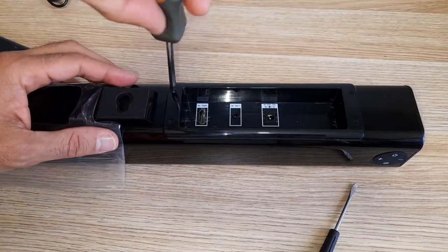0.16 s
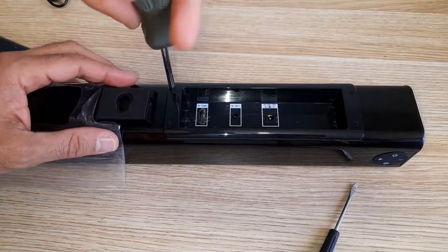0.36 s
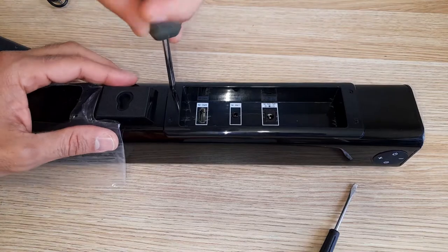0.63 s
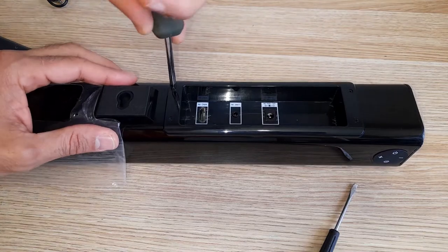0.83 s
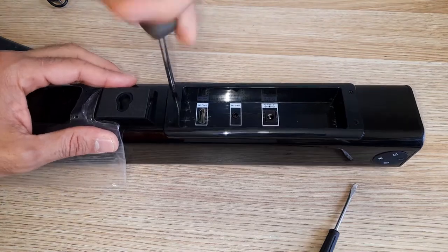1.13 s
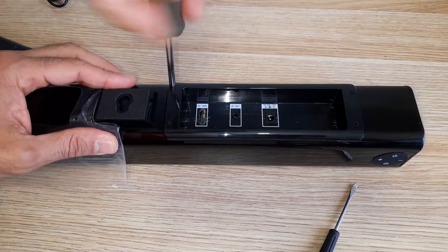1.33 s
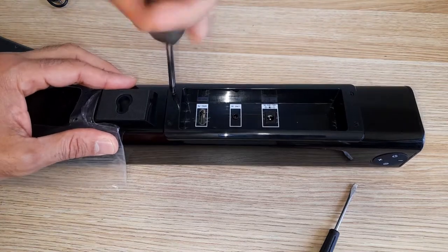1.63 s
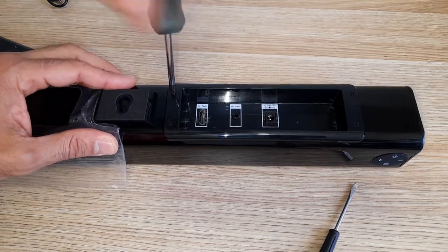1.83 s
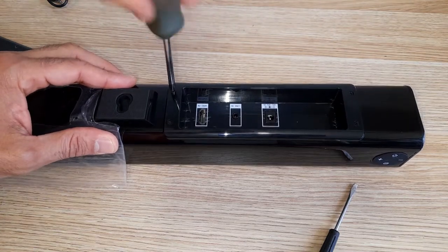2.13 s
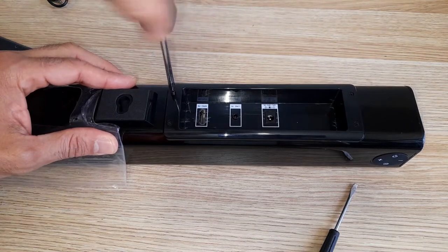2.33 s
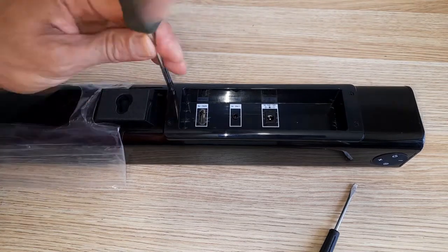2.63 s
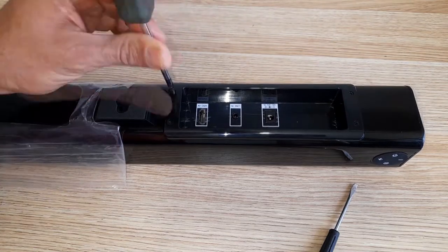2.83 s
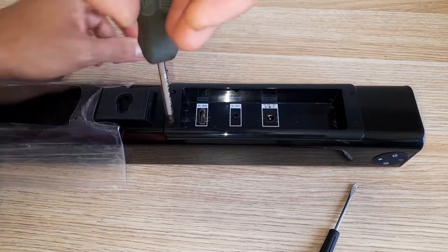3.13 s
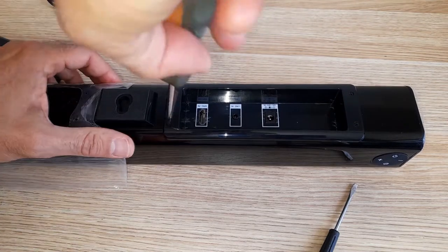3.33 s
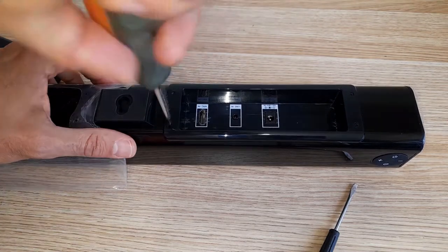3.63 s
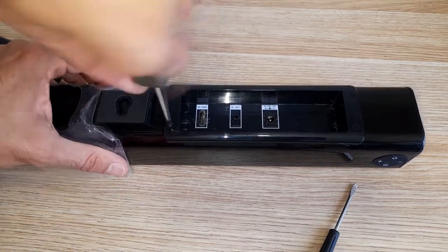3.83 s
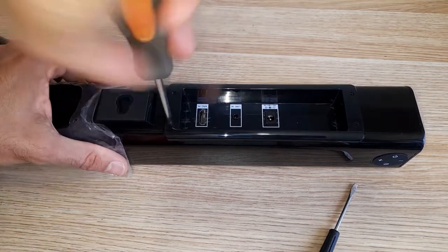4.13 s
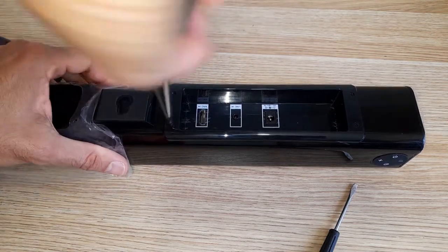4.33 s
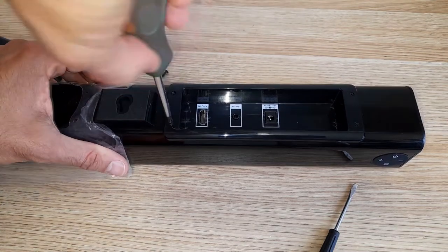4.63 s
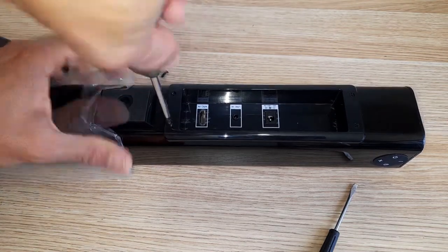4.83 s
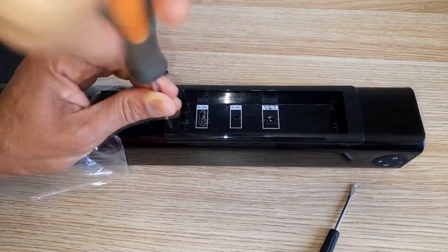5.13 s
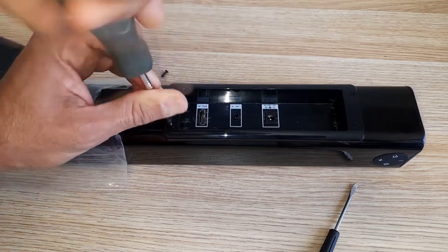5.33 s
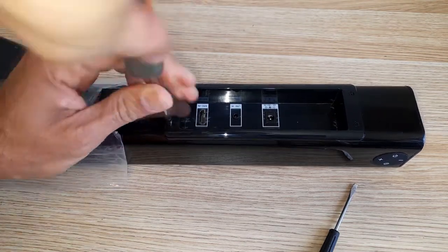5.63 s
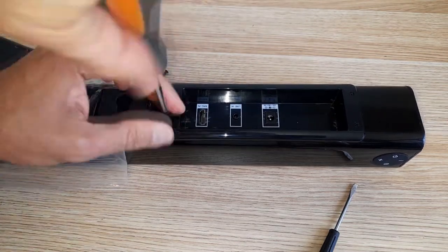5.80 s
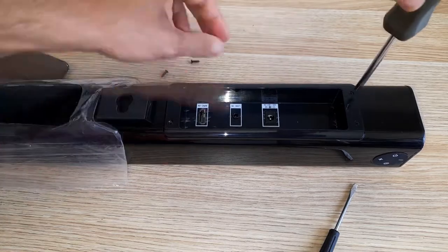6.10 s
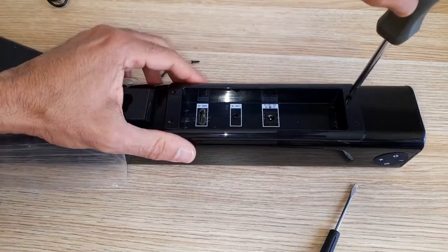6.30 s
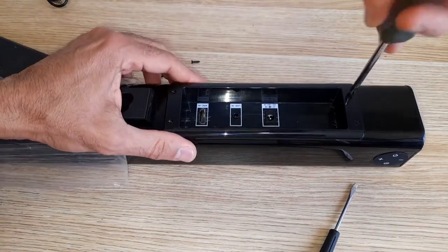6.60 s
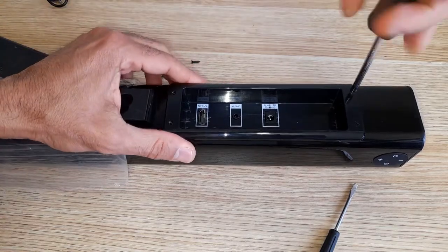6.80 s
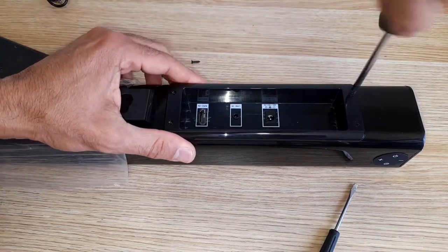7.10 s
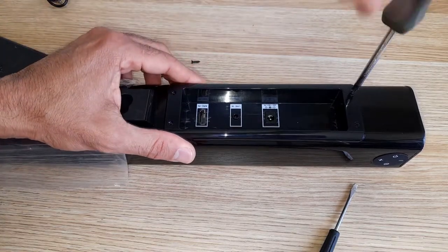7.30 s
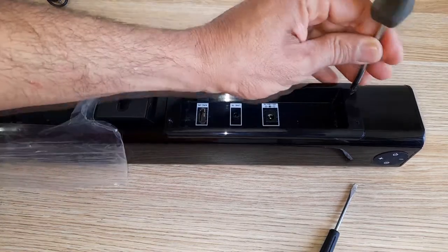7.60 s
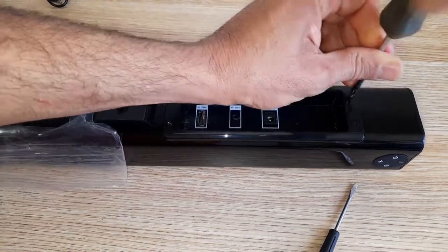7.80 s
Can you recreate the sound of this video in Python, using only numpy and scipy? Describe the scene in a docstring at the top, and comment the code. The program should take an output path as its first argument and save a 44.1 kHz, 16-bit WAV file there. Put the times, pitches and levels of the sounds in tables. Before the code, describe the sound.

A screwdriver taps, clicks and rubs inside a hollow plastic bar, with opening desk thuds, tiny screw rattles and a faint engine revving far outside.

```python
"""On a wooden desk in a quiet room, a screwdriver works on the screws of a hollow plastic bar.
Under the first knocks the desk top booms; then taps and scrapes in the casing follow in rapid succession.
Blows ring decaying sines and shaped noise; random slips drive the casing modes. Loose screws tick and
rattle on the desk, and far outside an engine speeds up: harmonics of a rising firing rate over a roar."""
import sys
import numpy as np
from scipy import signal
from scipy.fft import rfft, irfft
from scipy.io import wavfile

SR = 44100
rng = np.random.default_rng(int(sys.argv[2]) if len(sys.argv) > 2 else 0)


def wav_record(signal):
    """Record a signal, one row per channel, as 16-bit PCM in the file named by sys.argv[1]."""
    frames = np.transpose(np.atleast_2d(signal))
    bounded = np.clip(frames, -1, 1)
    # unit amplitude maps onto the largest positive 16-bit level
    quanta = np.round(bounded * 32767).astype(np.int16)
    wavfile.write(sys.argv[1], SR, quanta)


N = 350595
HZ = np.fft.rfftfreq(N, 1 / SR) + 1e-3   # the offset keeps the logarithm finite
SCRAPE_S = 1.12   # the continuous scraping starts
SECOND_S, MOVE_S = 2.7, 6.17   # the blade moves to the second screw, then to the right (third) screw


def from_db(db):
    """Level: decibels become an amplitude ratio."""
    return 10 ** (np.asarray(db) / 20)


def rms_one(x):
    """Normalisation: a signal is scaled to unit rms."""
    return x / np.sqrt(np.mean(x ** 2) + 1e-20)


def peak_at(rows, db):
    """Normalisation: each row is scaled to its peak level."""
    return rows * (from_db(db) / np.max(np.abs(rows), axis=1))[:, None]


def in_time(rows):
    """Linear interpolation: each column of a curve becomes one value a sample."""
    s, *columns = np.transpose(rows)
    return [np.interp(np.arange(N) / SR, s, c) for c in columns]


def at_hz(points):
    """Interpolation over log frequency: a spectrum is read at every frequency bin."""
    hz, values = np.array(points).T
    return np.interp(np.log(HZ), np.log(hz), values)


def coloured(x, spectrum):
    """Minimum-phase filtering: the folded cepstrum gives a spectrum's colour with no early sound."""
    cepstrum = irfft(at_hz(spectrum) * np.log(10) / 20, N)
    cepstrum[1:N // 2] *= 2
    cepstrum[N // 2 + 1:] = 0
    return irfft(rfft(x) * np.exp(rfft(cepstrum)), N)


def filtered(x, order, hz, kind="low"):
    """Butterworth filtering: one side of a cutoff frequency is attenuated."""
    return signal.sosfilt(signal.butter(order, hz, kind, fs=SR, output="sos"), x)


def drift(rate_hz):
    """Low-passed noise: a slow random wander of unit rms."""
    r = np.exp(-2 * np.pi * rate_hz / SR)
    return rms_one(signal.lfilter([1], [1, -2 * r, r * r], rng.standard_normal(N)))


def add(out, times, rows):
    """Superposition: each row is added into the output at its time."""
    for s, row in zip(times, rows):
        i = int(s * SR)
        out[i:i + len(row)] += row[:N - i]
    return out


def ring(force, hz, t60):
    """Resonance: a two-pole mode answers a unit click with a dying sine of initial height 1."""
    r, w = from_db(-60 / (t60 * SR)), 2 * np.pi * hz / SR
    return signal.lfilter([0, np.sin(w)], [1, -2 * r * np.cos(w), r * r], force + 1e-18)


def strike(times, db, modes, spread_db, detune, contact_s, tuning):
    """Modal impact: a short uneven contact excites modes whose strength and tuning vary by blow."""
    t = np.arange(int(max(m[2] for m in modes) * SR)) / SR
    contact_n = 800
    luck = rng.standard_normal((len(times), 2 * len(modes) + contact_n))
    rows = 0
    for k, (hz, level_db, t60) in enumerate(modes):
        size = from_db(level_db + spread_db * luck[:, 2 * k])[:, None]
        tuned_hz = (tuning * hz * (1 + detune * luck[:, 2 * k + 1]))[:, None]
        rows = rows + size * from_db(-60 * t / t60) * np.sin(2 * np.pi * tuned_hz * t)
    window = np.exp(-(np.arange(contact_n) / SR / contact_s[:, None] - 1.5) ** 2)
    contact = luck[:, -contact_n:] * window
    return add(np.zeros(N), times, peak_at(signal.fftconvolve(rows, contact, axes=1), db))


def push(times, db, modes, late_s, swell_s, pitch, spread_db):
    """Slow modal excitation: low modes start late, swell, then die; pitch multiplies each mode."""
    t = np.arange(int(max(m[2] for m in modes) * SR)) / SR
    column = t[:, None]
    luck = rng.standard_normal((len(times), len(modes)))
    rows = 0
    for k, (hz, level_db, t60) in enumerate(modes):
        size = from_db(level_db + spread_db * luck[:, k] - 60 * column / t60)
        rows = rows + size * np.sin(2 * np.pi * pitch * hz * column)
    swell = 1 - np.exp(-(t / swell_s) ** 2)
    return add(np.zeros(N), times + late_s, peak_at(rows.T * swell, db))


def puff(times, db, t60, rise_s=0.000063, channels=1):
    """Noise burst: the envelope of white noise rises and decays exponentially at each blow."""
    t = np.arange(int(np.max(t60) * SR)) / SR
    rise = 1 - np.exp(-t / np.reshape(rise_s, (-1, 1)))
    rows = from_db(db[:, None] - 60 * t / np.reshape(t60, (-1, 1))) * rise
    return add(np.zeros(N), times, rows) * rng.standard_normal((channels, N))


def crack(times, db, t60, low_hz):
    """High-passed noise burst: only the bright part of a puff is kept."""
    return filtered(puff(times, db, t60), 2, low_hz, "high")


def grains(per_s, uneven_db):
    """Stick-slip friction: random clicks of uneven size and either sign, at unit rms."""
    sizes = from_db(uneven_db * np.minimum(rng.exponential(1, N), 4)) * rng.choice([-1, 1], N)
    return rms_one(sizes * (rng.random(N) < per_s / SR))


# Room tone spectrum. Each row: frequency in Hz, gain in dB.
ROOM_SPECTRUM = [(15, -67), (25, -36), (108, -14.5), (349, -4.5), (706, -9.5), (1640, -12.5), (1930, -17),
                 (3510, -21.5), (5570, -29.5), (15200, -54.5), (16500, -47)]
ROOM_DB = -77.5


def room_tone():
    """Diffuse background noise: mostly independent at the two ports, its level drifting slowly."""
    air = rng.standard_normal((3, N))
    noise = coloured(air[:2] * 10.0 + air[2], ROOM_SPECTRUM)
    return from_db(ROOM_DB + 1.1 * drift(3.1)) * rms_one(noise)


# Small modes of the casing end at the left screw hole. Each row: frequency in Hz, gain in dB.
LEFT_END = [(260, -53.5), (450, -20.5), (674, -40.5), (992, -10.5), (1440, -16), (1900, 5), (2300, 1.5),
            (2670, -16.5), (3150, -12.5), (3570, -39), (4500, -25), (5850, -62)]
# Small modes of the casing end at the right screw hole. Each row: frequency in Hz, gain in dB.
RIGHT_END = [(260, -49), (450, -19), (715, -30.5), (875, -11), (1050, -26.5), (1190, -8.5), (1930, 4),
             (2670, -22.5), (2890, -7.5), (3180, -27), (4500, -29), (6500, -52)]


def casing(x):
    """Modal filtering: the casing end being worked colours the force."""
    left = np.arange(N) < MOVE_S * SR
    return coloured(x * left, LEFT_END) + coloured(x * ~left, RIGHT_END)


# Short slides of blade or finger. Each row: middle in seconds, length in seconds (twice the 1/e
# half-width), level at the wall in dB, level of the rasp in dB.
SLIDES = [(2.074, 0.03, -66, -81), (2.482, 0.045, -72, -78), (4.8, .045, -61, -79), (4.5, 0.038, -61, -74),
          (3.29, .1, -90, -70.5), (3.67, .021, -60, -86), (3.925, 0.047, -67, -68),
          (4.886, 0.018, -79, -46.5), (5.053, .019, -95, -66.5), (5.094, 0.03, -67, -74),
          (5.501, 0.027, -75, -71.5), (5.561, 0.028, -76.5, -71.5), (5.926, 0.041, -71, -71.5),
          (6.525, 0.032, -62, -81), (5.8, .057, -56, -66), (7.247, 0.035, -70, -91),
          (7.722, 0.028, -65, -78), (7.836, 0.07, -72.5, -88), (7.921, 0.041, -73, -80)]


def slides(column):
    """Gaussian envelopes: one smooth swell of rubbing for each slide."""
    t = np.arange(N) / SR
    return sum(from_db(row[column]) * np.exp(-((t - row[0]) / row[1] * 2) ** 2) for row in SLIDES)


# Hands settle on the casing. Each row: time in seconds, hiss in dB, hollow body in dB.
HANDLING = [(0, -70, -89), (.29, -75.5, -78.5), (.46, -65.5, -85), (.82, -80, -100), (1.12, -70.5, -67)]
# Airy hiss of skin on tape. Each row: frequency in Hz, gain in dB.
RUSTLE = [(1470, -48), (2500, -8), (3480, -7), (5820, -4.5), (13000, -2.5), (15600, -0.5), (16500, -11)]
# Rubbing of the turning blade. Each row: time in seconds, wall level in dB, hollow body in dB re wall.
RUB = [(1.12, -68, -1), (1.33, -72, 1.5), (2.2, -72.5, -6.5), (2.45, -73.5, 2), (2.79, -78.5, 14.5),
       (3.0, -88.5, 14.5), (3.75, -93.5, 19), (4.1, -75.5, 6), (4.45, -65.5, 7), (4.75, -78.5, 10.5),
       (5.15, -71, -0.5), (5.35, -66.5, 4.5), (5.78, -78.5, 2.5), (6.0, -98, 21.5), (6.55, -89.5, -6),
       (6.95, -66, -8.5), (7.55, -85.5, 5.5), (7.95, -75, 7)]
# Blade dragged in the slot. Each row: frequency in Hz, gain in dB.
RASP = [(2500, -9), (4300, -13.5), (5500, -2), (6800, -9), (12000, -12), (16500, -12.5)]
# Hollow body modes. Each row: multiple of its pitch, relative level in dB, nominal t60 in seconds.
HOLLOW = [(.79, -1.5, 0.046), (1, 1.5, 0.035), (1.13, -12.5, 0.034), (1.62, -14, 0.021)]
RASP_DB, RASP_FOLLOWS = -79, 0.36   # rasp at a wall level of -73 dB; share of the wall's swing in dB


def rubbing():
    """Friction: clumped slips drive the casing modes; a smooth hiss gives way to the blade's rasp."""
    wall_db, hollow_db = in_time(RUB)
    hiss_db, held_db = in_time(HANDLING)
    slips = grains(per_s=800, uneven_db=3.5)
    clumps = from_db(3.6 * drift(34))
    force = slips * clumps
    hollow = rms_one(sum(from_db(db) * ring(force, 345 * k, t60 * 0.83) for k, db, t60 in HOLLOW))
    wall = rms_one(casing(slips))
    hiss = rms_one(coloured(rng.standard_normal((2, N)), RUSTLE))
    rasp = rms_one(coloured(grains(per_s=2200, uneven_db=1.5), RASP))
    scraping = np.arange(N) > SCRAPE_S * SR
    wall_gain = from_db(wall_db) * rms_one(clumps) * scraping + slides(column=2)
    rasp_db = RASP_DB + RASP_FOLLOWS * (wall_db + 73.0) + 1.4 * drift(13)
    rasp_gain = from_db(rasp_db) * scraping + slides(column=3)
    hollow_gain = from_db(np.where(scraping, wall_db + hollow_db, held_db))
    hiss_gain = from_db(hiss_db) * ~scraping
    return hollow_gain * hollow + wall_gain * wall + rasp_gain * rasp + hiss_gain * hiss


# Low rumble that stops when the continuous scraping starts. Each row: time in seconds, level in dB.
RUMBLE = [(0, -79), (.3, -79.5), (.92, -81), (.95, -58), (1.05, -69), (1.12, -70)]
# Desk top modes. Each row: nominal frequency in Hz, level in dB (for knocks), nominal t60 in seconds.
BOOM = [(81.4, 2.5, 0.18), (104, -2, 0.2), (159.3, -17, 0.12)]


def rumble():
    """Resonance under steady noise: the desk top modes, here equally driven, ring low."""
    noise = sum(ring(rng.standard_normal(N), hz, t60 * 0.54) for hz, db, t60 in BOOM)
    sounding = np.arange(N) < RUMBLE[-1][0] * SR
    return from_db(in_time(RUMBLE)[0]) * rms_one(noise) * sounding


# Knocks that reach the desk. Each row: start in seconds, nominal level in dB, then boom and brightness
# in dB re that level before fixed trims, ring time in seconds, casing ring in dB re that level.
KNOCKS = [(0.101, -32.5, -11.5, 9.5, 0.043, -8), (0.11, -33, -20, 1.5, 0.19, -19),
          (0.287, -54, -27, -11, 0.43, -11), (0.317, -31, -22, -18.5, 0.13, -6.5),
          (0.354, -37.5, -3.5, -24, 0.19, 10), (0.935, -50, -33, 5, 0.16, -15),
          (1.109, -31, -66, 4.5, 0.037, -1.5)]
# Desk and resting casing. Each row: frequency in Hz, gain in dB.
DESK = [(200, -12.5), (663, -2.5), (872, -14), (1160, -16.5), (1590, -13), (1980, -17.5), (2380, -32.5),
        (3120, -21), (3610, -43), (4500, -35), (5850, -23), (9900, -120)]
# Casing resting on the desk. Each row: nominal frequency in Hz, level in dB, t60 in seconds.
KNOCK_MODES = [(556, -7, 0.031), (683, 6, 0.033), (744, -19, 0.025), (1526, -2, 0.02)]
KNOCK_TOP_HZ = 1500   # the broad contact with the desk dulls the ring above this


def knocks():
    """Impact on a plate: a noisy thud at once, and a boom some 12 ms late, once the push has spread."""
    s, db, boom, bright, t60, ring_db = np.transpose(KNOCKS)
    low = push(s, db + boom, BOOM, late_s=0.0118, swell_s=0.013, pitch=0.98, spread_db=4.0)
    split_hz = 1800
    dull = filtered(puff(s, db + 9.5, t60), 3, split_hz)
    sharp = crack(s, db + 0.78 * bright + 23.5, t60, low_hz=split_hz)
    contact_s = np.full(len(s), .0002)
    body = strike(s, db + ring_db, KNOCK_MODES, spread_db=13.0, detune=0.033,
                  contact_s=contact_s, tuning=0.99)
    body = filtered(body, 3, KNOCK_TOP_HZ)
    top = crack(s, db + bright - 3.0, t60, low_hz=3360)
    top = signal.lfilter([.5], [1, -.5], top)   # wood dulls the very top
    return coloured(dull + sharp, DESK) + body + low + top


def crowd(times, db, t60, rise_s):
    """Dense modal response: noise bursts ring the small modes of the casing end being worked."""
    t = np.arange(int(t60 * SR)) / SR
    noise = rng.standard_normal((len(times), len(t)))
    burst = noise * from_db(-60 * t / t60) * (1 - np.exp(-t / rise_s[:, None]))
    click = np.arange(N) == 0
    left, right = (coloured(click, end)[:2000] for end in (LEFT_END, RIGHT_END))
    ends = np.where(times[:, None] < MOVE_S, left, right)
    return add(np.zeros(N), times, peak_at(signal.fftconvolve(burst, ends, axes=1), db))


# Blade and fingers on the casing. Each row: start in seconds, nominal level in dB, then hollow body
# and brightness in dB re that level before fixed trims.
TAPS = [(1.1816, -45.5, 0.5, -44), (1.2375, -34, -25, -14.5), (1.3791, -21.5, -15.5, -29),
        (1.434, -25, -18, -32), (1.5052, -17.5, -15, -27), (1.6252, -16, -15, -31), (1.6667, -41, -3, -25),
        (1.746, -20, -11.5, -26.5), (1.786, -31.5, -14.5, -32), (1.8755, -17, -9, -28.5),
        (1.914, -35, -20, -26), (2.0059, -22, -11, -31), (2.1235, -17, -13.5, -28),
        (2.1631, -22, -15.5, -38), (2.2495, -14, -17, -25.5), (2.2835, -33.5, -8.5, -30),
        (2.3738, -17.5, -20, -28.5), (2.5262, -23.5, -11, -40), (2.5605, -40, -2, -5.5),
        (2.591, -33.5, 1, -31), (2.793, -34.5, -30, -39), (2.817, -23.5, -20, -40),
        (2.8287, -14, -8.5, -30), (2.8603, -20, 0.5, -28), (2.9315, -42, 14.5, -26), (3.2292, -26, -6, -24),
        (3.2353, -15, -11.5, -32.5), (3.2616, -47, -9, -6.5), (3.4529, -21, -19, -9.5),
        (3.587, -17.5, -9, -7), (3.6982, -7.5, -7, -29.5), (3.759, -49.5, 12.5, 3.5),
        (3.9221, -23, -5, -24.5), (3.986, -24, -7, -30), (3.993, -11, -9, -20.5),
        (4.0459, -10.5, -10.5, -26.5), (4.1792, -31, -16, -38), (4.2065, -30.5, -47, -17.5),
        (4.2949, -32.5, -9, -39), (4.3021, -29.5, -24, -32), (4.3834, -10.5, -25, -29.5),
        (4.3898, -5.5, -13.5, -22.5), (4.433, -36, -12, -41), (4.5086, -28, -3.5, -35),
        (4.588, -23, -38, -31.5), (4.6501, -40, 2, -23), (4.7418, -19.5, -17.5, -26.5),
        (4.7913, -27, -9.5, -33), (4.8926, -24, -10.5, -25), (5.166, -53, 13, -22), (5.232, -36, -34, -52),
        (5.3026, -45.5, 6, -16), (5.341, -26, -16, -39.5), (5.3783, -44.5, 12.5, -41),
        (5.4562, -28.5, -1, -31.5), (5.668, -48, -13, -24), (5.7163, -36, -1, -63), (5.743, -34, -6, -22.5),
        (5.7811, -26, -4.5, -33), (5.815, -27, 1, -44), (5.9541, -43, -15.5, -11.5),
        (6.2384, -29.5, -7, -28.5), (6.2847, -33, -7.5, -33), (6.3469, -32, -7, -15),
        (6.3616, -19, -17.5, -11.5), (6.4684, -17.5, -5.5, -6), (6.5522, -26, -34, -22),
        (6.5612, -15.5, -6.5, -22.5), (6.5965, -29, 1, -26), (6.6856, -37, -32, -29), (6.7513, -38, -5, -6),
        (6.809, -29.5, -23, -12.5), (6.8663, -39.5, -15, -30), (6.8997, -39, -30, -2),
        (6.926, -31.5, -31, -9), (6.945, -28.5, -19, -24), (6.992, -35.5, -24, -22.5),
        (7.056, -31, -28, -11), (7.115, -51, 10, -17), (7.196, -20.5, -8, -19.5), (7.3236, -32, 1.5, -26.5),
        (7.368, -37.5, 4.5, -26.5), (7.444, -29, -12.5, -25.5), (7.4757, -40.5, 0.5, -18),
        (7.5013, -35, -3, -22.5), (7.654, -59.5, -4, -24), (7.7407, -39, -4.5, -36),
        (7.795, -47.5, -3, -14), (7.8278, -51, 14.5, -22), (7.8928, -62.5, 25.5, -30)]
# The hollow body follows the grip. Each row: time in seconds, mean pitch in Hz, lowest mode's added dB.
GRIP = [(1.1, 407, -9), (1.6, 409, -15), (2.0, 340, -17.5), (2.6, 342, -3.5), (3.3, 348, -1),
        (3.8, 353.3, 0), (4.0, 397, -2.5), (4.4, 385, -4.5), (4.7, 349, -5), (5.802, 340, 6.5),
        (6.3, 349, -7.5), (7.95, 341, -2.5)]
# Casing wall modes. Each row: nominal frequency in Hz, t60 in seconds, level in dB at the first,
# the second and the third screw.
WALL = [(993, 0.035, -18, -24, -19), (1195, 0.02, -19, -21, -9), (1312, .018, -11.5, -21, -8),
        (1552, 0.01, -14, -16.5, -11), (1760, 0.018, -23, -6.5, -5), (1975, 0.031, -7, 14, 1),
        (2004, 0.04, 0, 3, -4), (2228, .02, 8.5, -8, -24), (2393, 0.02, -3, -13, -2.5),
        (2810, 0.016, -34, -24, -11.5)]
# Steel on steel. Each row: frequency in Hz, gain in dB.
BLADE = [(2060, -38), (3500, -10.5), (4280, -11), (5880, 2.5), (7240, -8.5), (11200, -12), (15200, -17.5),
         (16500, -26.5)]
WALL_FLOOR_HZ = 950   # the wall's ring is filtered out below this


def taps():
    """Coupled resonators: the wall answers at once, the cavity swells later; steel adds a bright crack."""
    s, db, hollow, bright = np.transpose(TAPS)
    at, hollow_hz, low_db = np.transpose(GRIP)
    contact_s = 0.0003 * from_db(-.3 * (db + 14))   # light touches are blunter
    (k, level_db, t60), *upper = HOLLOW
    modes = [(k, level_db + np.interp(s, at, low_db), t60), *upper]
    pitch_hz = np.interp(s, at, hollow_hz) * (1 + .02 * rng.standard_normal(len(s)))
    body = push(s, db + hollow - 10.5, modes, late_s=0.0018, swell_s=0.0089,
                pitch=pitch_hz, spread_db=5.5)
    screw = np.searchsorted([SECOND_S, MOVE_S], s)
    modes = [(hz, np.array(levels_db)[screw], t60) for hz, t60, *levels_db in WALL]
    wall = strike(s, db - 7.0, modes, spread_db=5.5, detune=0.0076,
                  contact_s=contact_s * 0.69, tuning=0.99)
    wall = filtered(wall, 3, WALL_FLOOR_HZ, "high")
    small = crowd(s, db - 8.5, t60=0.024, rise_s=contact_s)
    snap = puff(s, db + bright + 10.0, t60=0.03, rise_s=contact_s * 0.51)
    # bounced off desk and hands, unlike at the two ports
    scatter = puff(s, db + bright, t60=0.08, rise_s=0.0011, channels=2)
    return wall + small + body + coloured(snap + scatter, BLADE)


# Loose screws drop and bounce. Each row: first bounce in seconds, nominal level in dB, first flight
# in seconds, ratio of each flight to the last, loss in dB a bounce.
DROPS = [(3.138, -42.5, 0.018, 1.1, 1), (6.1084, -43.5, 0.0115, 1.02, 2.5)]
# Rattle of the screws. Each row: frequency in Hz, gain in dB.
SCREW = [(880, -14.5), (1500, -9.5), (2550, -3.5), (5640, 0), (11400, -2), (13100, -3), (15900, -2),
         (16500, -7)]
# Screw modes. Each row: mean frequency in Hz, level in dB, t60 in seconds.
SCREW_MODES = [(2820, -11, 0.0097), (5180, -0.5, 0.0063), (6250, 1, 0.0055), (12840, 2, .006)]
TIP_LEAD_S, TIP_DB, BOUNCE_SPREAD_DB = 0.006, -3.5, 2.5   # the tip lands just before the head


def screws():
    """Repeated impact: fading, ringing ticks lie over the softer rattle of the rolling thread."""
    k = np.arange(6)
    times, levels = [], []
    for at, top_db, flight_s, ratio, loss_db in DROPS:
        bounces = at + flight_s * (1 - ratio ** k) / (1 - ratio)   # geometric sum of flights
        times.append(np.r_[at - TIP_LEAD_S, bounces])
        levels.append(top_db + np.r_[TIP_DB, -loss_db * k])
    s, db = np.concatenate(times), np.concatenate(levels)
    db = db + BOUNCE_SPREAD_DB * rng.standard_normal(len(db))
    ticks = strike(s, db + 0.5, SCREW_MODES, spread_db=2.0, detune=0.038,
                   contact_s=np.full(len(s), .00004), tuning=1)
    ticks = filtered(ticks, 2, 2000, "high")   # a small screw gives no bass
    rattle = puff(s, db - 4.5, t60=0.0087) + puff(s, db - 6.0, t60=0.072, rise_s=0.0026, channels=2)
    return ticks + coloured(rattle, SCREW)


# Engine speeding up. Each row: time in seconds, mean firing rate in Hz, relative tone level in dB.
ENGINE = [(4.267, 139.2, -72), (4.42, 155.5, -57.5), (4.5, 160.3, -46), (4.597, 172.6, -51),
          (4.662, 183.6, -68), (4.901, 219, -49.5), (5.101, 250, -60), (5.269, 265.7, -63),
          (5.33, 272.1, -54), (5.45, 285.6, -48), (5.56, 294, -66)]
# Engine orders. Each row: multiple of the firing rate, relative level in dB.
ENGINE_ORDERS = [(1, -7), (2, -4.5), (4, -25.5)]
# What lets the engine in. Each row: centre in Hz, half-width in Hz, gain at the centre in dB.
WINDOW = [(312.4, 35, 25), (630, 28, -11), (1134, 60, 21.5)]
# Exhaust noise. Each row: frequency in Hz, gain in dB.
ROAR = [(500, -47), (900, -1.5), (1150, 4), (1400, -0.5), (2000, -28)]


def engine():
    """Harmonic series: wavering firing tones cross resonances on the way in; a roar grows with speed."""
    hz, db = in_time(ENGINE)
    t = np.arange(N) / SR
    turns = np.cumsum(hz * (1 + .004 * drift(30))) / SR
    fade = np.clip(np.minimum(t - ENGINE[0][0], ENGINE[-1][0] - t) / 0.087, 0, 1)
    roar = rms_one(coloured(rng.standard_normal(N), ROAR))
    out = from_db(-71.5 + 19 * np.log10(hz / 250)) * roar
    for k, order_db in ENGINE_ORDERS:
        lift_db = sum(top_db / (1 + ((k * hz - centre) / width) ** 2) for centre, width, top_db in WINDOW)
        tone_db = db + order_db + lift_db - 11.5 + 2.1 * drift(6)
        out = out + from_db(tone_db) * np.sin(2 * np.pi * k * turns)
    return fade * out


ROOM_T60_S, WALL_CUT_HZ, WET_DB = 0.073, 1700, -13.5


def room(x):
    """Reverberation: decaying reflections, separate at each port, build over a few ms; treble is dull."""
    t = np.arange(int(.25 * SR)) / SR
    onset = 1 - np.exp(-(t / 0.0023) ** 2)
    cloud = rng.standard_normal((2, len(t))) * from_db(-60 * t / ROOM_T60_S) * onset
    cloud = filtered(cloud, 1, WALL_CUT_HZ)
    cloud = cloud / np.sqrt(np.sum(cloud ** 2) / 2)
    return signal.fftconvolve(x[None], cloud, axes=1)[:, :N]


# Phase between the ports. Each row: frequency in Hz, lead of the left in radians.
LEAD = [(60, 0.39), (2500, 0.31), (4500, 1.66), (9000, 1.61)]
# Level between the ports. Each row: frequency in Hz, left minus right in dB.
TILT = [(60, -3.5), (2400, -3), (5000, -1.5)]


def ports(x):
    """Interchannel difference: two microphone ports hear the desk unlike in level and phase."""
    half = from_db(at_hz(TILT) / 2) * np.exp(.5j * at_hz(LEAD))
    return irfft(rfft(x) * np.array([half, 1 / half]), N)


BASS_CUT_HZ = 122   # deep bass is filtered out of the rubbing, taps, screws and engine


def scene():
    """Superposition: direct sound, reverberation and room tone; a high-pass spares knocks and rumble."""
    tone = room_tone()
    thin = filtered(rubbing() + taps() + screws() + engine(), 3, BASS_CUT_HZ, "high")
    sources = thin + rumble() + knocks()
    return ports(sources) + from_db(WET_DB) * room(sources[0]) + tone


CUTOFF_HZ = 16900


def record(dry):
    """Band limiting: a steep low-pass filter cuts the top."""
    return signal.sosfilt(signal.cheby2(12, 70, CUTOFF_HZ, fs=SR, output="sos"), dry)


dry = scene()
out = record(dry)
wav_record(out)
```